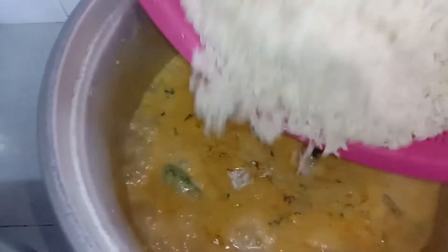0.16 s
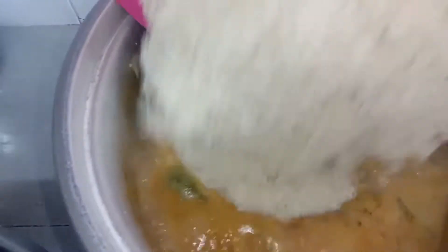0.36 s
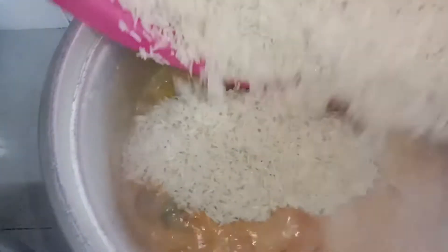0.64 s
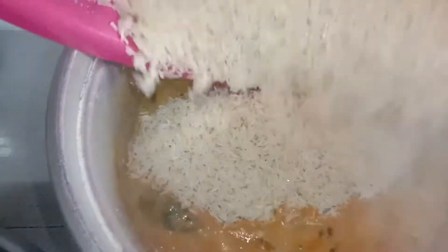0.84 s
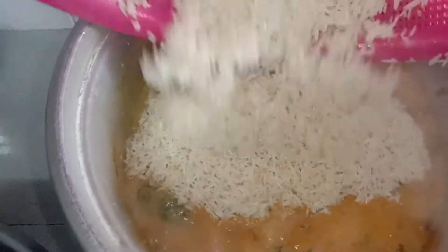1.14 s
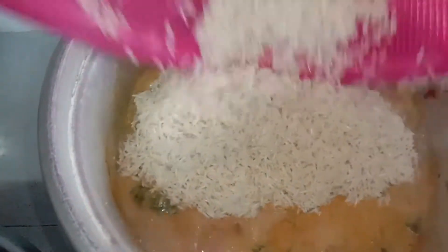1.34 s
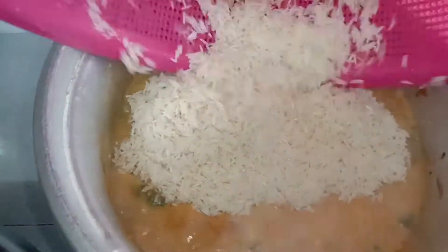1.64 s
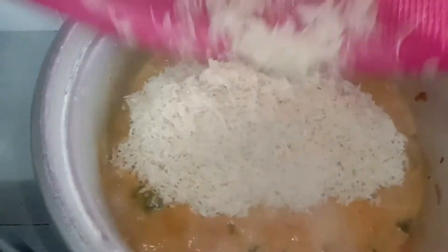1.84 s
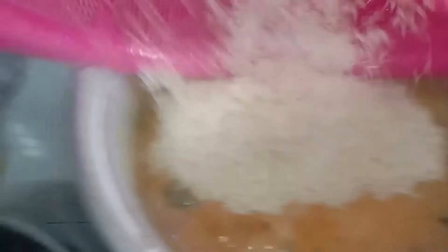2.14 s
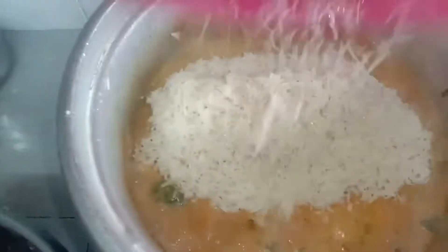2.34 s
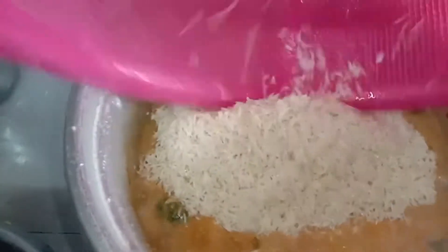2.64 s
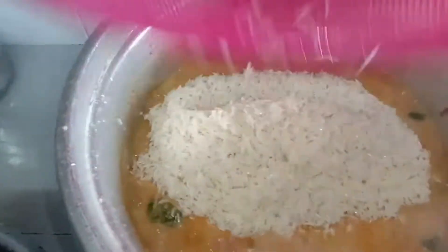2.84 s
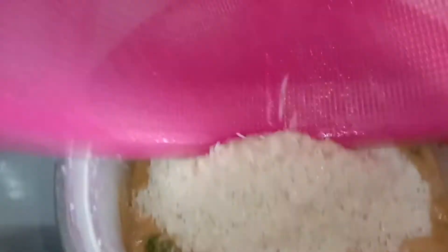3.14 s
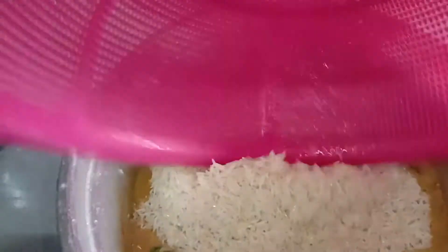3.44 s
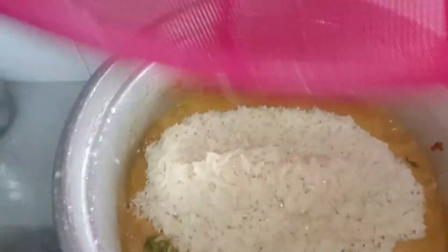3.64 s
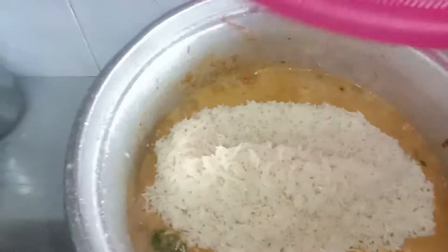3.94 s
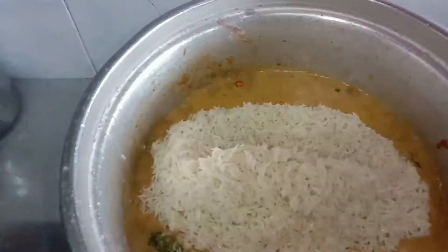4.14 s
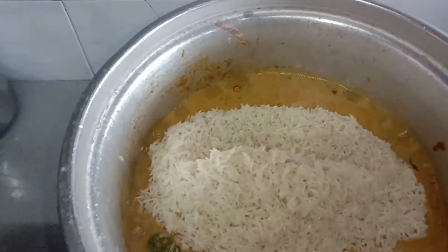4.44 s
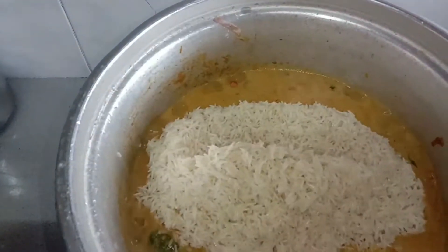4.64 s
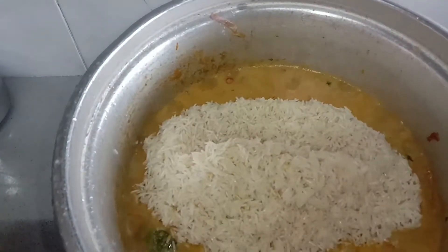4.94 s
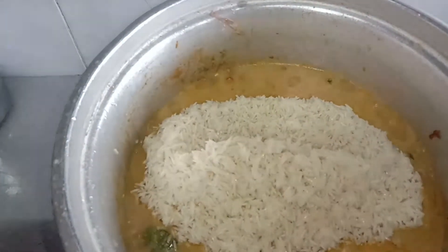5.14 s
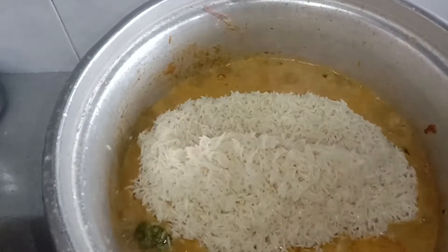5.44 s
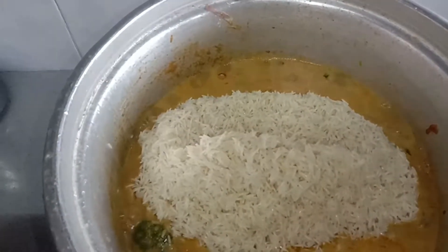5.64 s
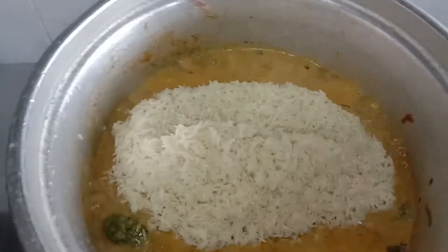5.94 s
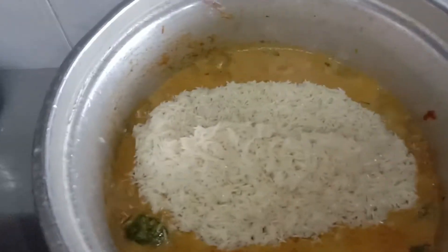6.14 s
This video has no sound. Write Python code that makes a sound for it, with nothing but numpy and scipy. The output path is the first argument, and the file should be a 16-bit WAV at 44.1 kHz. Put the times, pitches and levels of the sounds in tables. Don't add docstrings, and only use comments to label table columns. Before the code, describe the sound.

From 0 to 0.8 s, broth simmers softly over a low burner rumble, with a couple of round bubble plops, a small clink near 0.3 s and a faint slide of wet rice. From 0.87 s to 3.2 s a hand slaps the plastic colander about every quarter second, ten loud sharp cracks, some doubled, each with a rattle, a touch of air thump and a short tiled-room echo that lengthens as the colander empties. Between slaps, wet rice patters in uneven bursts until about 2.6 s, with stray grains ticking and steam hissing faintly. After 3.3 s the echo fades to quiet simmering; a light dish knock comes at 3.6 s, bubbles plop and tiny clinks around 3.9-4.7 s. A hard clack at 4.84 s starts bumps and rattles through 5.7 s, including a strong ringing knock at 5.55 s. Bubbling closes it, with a clear pop near 6.16 s. Close phone microphone.

```python
import sys
import numpy as np
from scipy import signal
from scipy.fft import rfft, irfft, next_fast_len
from scipy.io import wavfile
from scipy.ndimage import uniform_filter1d

SR = 44100
rng = np.random.default_rng(int(sys.argv[2]) if len(sys.argv) > 2 else 0)


def rack_gain(trim_db):
    fader = np.asarray(trim_db, float)
    return 10 ** (fader / 20)


def generate_wav(sig):
    pcm = np.round(np.clip(np.atleast_2d(sig).T, -1, 1) * 32767).astype(np.int16)
    wavfile.write(sys.argv[1], SR, pcm)


N = 277385
SIZE = next_fast_len(N)

# time in seconds, simmer in dB, rumble in dB.
BROTH = [(0.0, -46, -53.5), (0.47, -44.5, -59), (0.8, -50, -59), (1.0, -46, -56), (2.3, -43, -59),
         (2.6, -44.5, -52.5), (3.2, -61, -53), (3.6, -48.5, -50), (4.12, -48, -53.5), (4.75, -51, -56),
         (5.05, -43.5, -53.5), (5.29, -49, -49), (5.45, -51.5, -55), (5.75, -45, -44.5), (6.29, -45.5, -60)]
# frequency in Hz, level in dB.
SIMMER_TONE = [(150, -37.5), (300, -6.5), (500, -5), (1000, -10.5), (1400, -16), (1800, -15.5), (3000, -35),
               (6000, -54)]
# frequency in Hz, width in Hz, boost in dB.
RUMBLE_PEAKS = [(106, 26, 21.5), (126, 260, 8.5)]
# frequency in Hz, level in dB.
HISS_TONE = [(900, -23), (2000, -9), (3000, -5.5), (4300, -11.5), (7500, -9.5), (10000, -9), (13000, -14.5),
             (16000, -17.5)]
# frequency in Hz, 60 dB decay in seconds, level in dB.
AIR_HUM = [(409, 0.071, -4.5), (815, 0.028, -13), (947, 0.036, -3), (1240, 0.12, -3), (1300, 0.074, -2.5)]
# frequency in Hz, level in dB.
TAIL_TONE = [(40, -16), (120, 3.5), (300, -7), (860, -10.5), (2500, -3), (5000, -5), (9000, -9.5),
             (16000, -21.5)]
# frequency in Hz, width in Hz, boost in dB.
POT_PEAKS = [(440, 7.4, 5.5), (950, 110, 8), (1276, 41, 14), (1600, 390, -2.5), (2180, 36, 0.5),
             (3000, 270, 4)]
# start in seconds, rms level in dB, centre in Hz, width in Hz,
# 60 dB decay in seconds.
CLINKS = [(.005, -48, 3550, 500, 0.34), (0.066, -38.5, 2350, 400, .08), (.2, -62, 3000, 200, 0.16),
          (.297, -29, 3080, 250, 0.029), (.65, -53, 2610, 400, 0.45), (3.577, -43.5, 2820, 500, 0.46),
          (3.92, -61, 5700, 600, 0.51), (4.096, -53, 7400, 500, 0.4), (4.11, -58, 8600, 250, .4),
          (4.096, -56, 10000, 600, .3), (4.084, -52, 3900, 500, .15), (4.15, -50, 2800, 200, .25),
          (3.915, -56, 3500, 500, .15), (3.975, -58, 5600, 500, .2), (4.114, -39, 2300, 2000, 0.14),
          (4.257, -56, 3750, 500, .15), (4.395, -57, 2870, 250, .15), (4.3, -62, 7260, 900, 0.55),
          (4.53, -64, 5350, 250, 0.5), (4.67, -62, 5300, 250, .3), (4.841, -31, 2960, 300, 0.25),
          (5.172, -30, 2030, 200, 0.057), (5.389, -46, 3150, 900, 0.4), (5.547, -27.5, 1720, 70, .26),
          (5.546, -45, 2760, 90, 0.41), (5.562, -47, 8600, 250, 0.21), (5.565, -48, 10400, 250, 0.25),
          (5.56, -50, 7600, 200, .3), (5.57, -51, 6800, 200, .3), (5.56, -56, 11500, 250, .3),
          (5.66, -52, 10400, 300, .2), (5.66, -52, 8600, 300, .2), (5.86, -63, 5650, 260, .9),
          (6.183, -47, 2400, 300, .04), (5.688, -33.5, 2754, 200, 0.14), (5.98, -54, 2850, 900, 1.8),
          (6.222, -60, 7600, 150, .15), (6.24, -66, 5500, 200, .3)]
# start in seconds, hold in seconds, rms level in dB, pitch in Hz.
GURGLES = [(.0, .03, -45, 430), (.07, .03, -47, 450), (.355, .03, -48, 420), (.63, .04, -49, 1270),
           (.933, .04, -36, 760), (.935, .06, -35.5, 1270), (1.745, .07, -36.5, 1060),
           (3.63, .07, -47, 1290), (3.91, .025, -47, 1265), (3.985, .02, -46, 1275), (4.015, .02, -49, 430),
           (4.045, .03, -50, 950), (4.135, .04, -48, 850), (4.2, .03, -50, 1270), (4.24, .055, -52, 430),
           (4.39, .055, -50, 440), (4.54, .08, -54, 980), (4.545, .06, -54, 410), (4.66, .06, -51, 430),
           (4.925, .04, -37, 1270), (4.92, .09, -41, 560), (5.06, .03, -41, 1350), (5.39, .08, -46, 1280),
           (5.7, .1, -41, 700), (5.82, .015, -43, 1300), (5.94, .03, -48, 850), (5.95, .02, -46, 1270),
           (6.02, .06, -47, 480), (6.05, .03, -51, 700), (6.225, .04, -47, 1250), (6.26, .02, -50, 420)]
# start in seconds, peak in dB, pitch in Hz.
BUBBLES = [(0.062, -27, 883), (0.265, -30, 1255), (0.363, -39, 412), (0.646, -42.5, 1170),
           (3.768, -44, 826), (3.915, -36.5, 1250), (3.947, -37, 775), (3.995, -39, 1230),
           (4.011, -34.5, 437), (4.037, -32, 863), (4.13, -26, 804), (4.148, -33, 864), (4.269, -43, 430),
           (4.401, -33.5, 455), (4.417, -34.5, 473), (4.418, -36.5, 1430), (4.533, -43, 403),
           (4.667, -45.5, 410), (4.754, -42, 844), (5.449, -38, 730), (5.818, -35, 832), (5.939, -37, 750),
           (5.953, -36.5, 1304), (6.02, -39, 474), (6.059, -35, 623), (6.091, -31.5, 1484),
           (6.099, -33, 1770), (6.162, -21, 1174), (6.183, -37.5, 1360), (6.229, -34.5, 957),]
# start in seconds, peak in dB, centre in Hz.
SPECKS = [(0.1984, -44, 4500), (0.5894, -48, 9000), (0.6044, -48, 9500), (0.7564, -50, 6000),
          (0.9714, -36, 11000), (1.0024, -33, 11000), (1.1674, -33, 11000), (1.2344, -38, 9500),
          (3.7944, -56, 7000), (3.8651, -55, 5000), (3.9135, -48, 3790), (3.9729, -50, 4500),
          (4.0821, -40, 12500), (4.0835, -40, 3900), (4.0954, -46, 3500), (4.2444, -52, 5000),
          (4.2617, -49, 4200), (4.2996, -51, 4000), (4.3964, -49, 2950), (4.4194, -54, 4200),
          (4.4394, -53, 4000), (4.5466, -50, 4300), (4.6628, -45, 7000), (4.6764, -45, 8000),
          (5.4624, -54, 9000), (5.5034, -51, 8500), (5.6984, -30, 4300), (5.7944, -46, 7500),
          (5.8591, -46, 8950), (5.9095, -47, 4400), (5.9274, -48, 11500), (5.9589, -48, 4000),
          (5.9944, -48, 4800), (6.1005, -47, 3600), (6.1609, -52, 12500), (6.1838, -50, 9000),
          (1.025, -34, 12000), (1.045, -34, 12000), (1.338, -32, 12000), (2.008, -27, 7000),
          (2.125, -30, 12000), (2.579, -22, 4000), (4.116, -36, 1800), (4.127, -36, 2600),
          (5.294, -29, 2800), (4.846, -22, 4000), (4.856, -25, 5000), (0.076, -38, 2500),
          (4.09, -46, 12500)]
# start in seconds, peak in dB, lower part in dB relative to it.
TICKS = [(0.3386, -32.5, 6), (0.527, -35, 6), (0.9887, -23.5, -11), (1.0084, -24, -5), (1.0294, -22, -3),
         (1.065, -20.5, -15), (1.0794, -19.5, 16.5), (1.258, -23, -3), (1.2705, -20.5, -17),
         (1.3206, -24, -18), (1.4035, -16.5, -12), (1.4575, -24, -7), (1.5095, -21, -7),
         (1.5753, -22.5, -8), (1.5888, -26.5, -11), (1.6112, -25, -12), (1.751, -12, -18),
         (1.797, -23, -13), (1.8234, -19, 2), (1.9894, -22, -17), (2.024, -23, -2), (2.0537, -18.5, -9),
         (2.1016, -22, -9), (2.2653, -25.5, -6.5), (2.312, -24.5, 5), (2.3236, -25.5, 4),
         (2.4054, -19.5, -40), (2.5795, -20, 4), (2.5854, -20.5, -2)]
# start in seconds, peak in dB, main ring in Hz, then treble and
# room tail in dB relative to the peak.
CLATTER = [(0.295, -30, 1315, -3.5, -14.5), (0.932, -21.5, 740, -20.5, -5), (1.747, -23, 1140, -8.5, -8),
           (3.568, -33.5, 1290, -2, -6.5), (3.629, -35, 1300, -10.5, -10), (4.081, -36.5, 1300, -22, -9),
           (4.111, -34.5, 824, -29.5, -8), (4.838, -12.5, 1507, -6, -7.5), (5.058, -26, 1310, -31.5, -15),
           (5.209, -18, 1460, -33.5, -16.5), (5.386, -36, 1300, -19, -6), (5.69, -24, 1300, -31, -13)]
# start in seconds, peak in dB, main ring in Hz, then boom and
# room tail in dB relative to the peak.
BUMPS = [(4.919, -20, 1170, -25.5, -11), (5.113, -17.5, 730, -5.5, -10), (5.13, -36, 1210, -9, -30),
         (5.172, -22.5, 2070, 1.5, -15), (5.293, -25.5, 1600, -15, -15.5), (5.318, -30.5, 725, -2.5, -34),
         (5.49, -46.5, 1280, -13, -4.5), (5.545, -12.5, 1715, -12, -18.5), (5.638, -31, 1300, 1.5, -12),
         (5.678, -19, 1235, -18, -9), (5.818, -36, 770, 5.5, -41), (5.978, -45.5, 1000, -5, -5)]
# time when fullest in seconds, hold
# in seconds, level in dB, # top octave in dB relative to it.
RICE = [
    (0.01, 0.064, -35, -9.5),
    (1.04, 0.013, -25.5, -12),
    (1.27, 0.0084, -33.5, -9),
    (1.45, 0.096, -25.5, -10.5),
    (1.66, 0.13, -28, -1.7),
    (1.96, 0.067, -24.5, -10),
    (2.17, 0.06, -27, -11.5),
    (2.49, 0.025, -24, -12.5),
    (2.69, 0.062, -73, -14.5),
]
# frequency in Hz, level in dB.
PATTER_TONE = [(700, -18.5), (1500, 2.5), (3600, 3.4), (6000, 10.5), (10000, -12), (16000, -22)]
# start in seconds, crack peak in dB, then thump, body and room tail in dB
SLAPS = [(0.8702, -29, -13, 12.5, -7), (0.874, 1.5, -53, -11.5, -21.5), (1.1112, -8, -57, -12, -16),
         (1.135, 1, -50, -16.5, -29), (1.3728, -7.5, -28, -11, -32), (1.3798, -1.5, -51, -18.5, -22),
         (1.6399, -18, -10, 2, -31), (1.643, -1, 0, -13, -19.5), (1.9108, 3.5, -33.5, -24, -23),
         (2.1263, -5, -30, -8, -17), (2.147, 0, -30, -17.5, -31.5), (2.4134, -16, -14.5, -17, -6),
         (2.4195, 0, -3, -14.5, -27), (2.6762, -7.5, -24.5, -2.5, -17), (2.6895, 1.5, -17.5, -22, -25.5),
         (2.9436, 1.5, -52, -31, -20.5), (2.9484, -9, -6.5, -7, -64), (3.1957, 5, -14, -30, -24.5),
         (3.2034, 1.5, -51, -22, -60.5)]
# frequency in Hz, level in dB.
CRACK_TONE = [(120, -58), (300, -1), (1000, -6), (2000, 1.5), (3500, 3.4), (6000, -0.5), (10000, -7.5),
              (16000, -20.5)]
# frequency in Hz, level in dB.
RIM = [(1265, -48.5), (1293, -34.5), (1676, -46.5), (1911, -63), (1934, -31.5), (2340, -34.5), (2358, -43),
       (2730, -43.5), (2955, -44), (2984, -46.5)]
RIM_T60_S = [0.7, 0.18, 0.71, 0.94, 0.55, 0.41, 0.51, 0.21, 0.26, 0.32]
# frequency in Hz, width in
# Hz, boost in # dB.
PHONE_PEAKS = [(8200, 650, -6), (13050, 4060, -16), (15500, 970, 7),
               (6450, 450, -7)]
PHONE_EDGES_HZ = [60, 15400]

HISS_REST_DB, HISS_TOP_DB, HISS_OFFSET_DB, HISS_LINGER_S = -62.5, -52, -9, 0.11
GURGLE_WIDTH_HZ, GURGLE_T60_S = 110, 0.05
BURST_T60_S, GENTLE_STRETCH = 0.035, 0.3
POP_DB, POP_RING_DB = -15, -19
CLATTER_BOOM_DB, BUMP_TREBLE_DB, BUMP_TREBLE_DB_PER_BOOM_DB = -62.5, -8, 0.98
STREAM_DB, STREAM_TOP_DB, STREAM_STEADY_S, STREAM_FALL_DB_PER_S = -42.5, -12.5, 0.55, 43
SLIP_RISE_DB_PER_S, SLIP_FALL_DB_PER_S, TOP_FALL_DB_PER_S = 331, 126, 51
FULL_T60_S, EMPTY_T60_S, T60_GAIN_PER_S = 0.19, 0.42, 0.32
THUMP_HZ, THUMP_T60_S, RIM_FLUTTER_DB = 89, 0.016, 2


def at(s):
    return int(s * SR)


def add(bus, s, x):
    i = at(s)
    bus[i:i + len(x)] += x[:N - i]


def fade(t60, length=0.56):
    t = np.arange(at(length)) / SR
    return rack_gain(-60 * t / max(t60, 0.001)), t


def walk(rate):
    k = int(SR / rate)
    steps = np.repeat(rng.standard_normal(N // k + 1), k)
    return 0.8 * uniform_filter1d(uniform_filter1d(steps, k), k)[:N]


def curves(table):
    s, *cols = np.transpose(table)
    return [np.interp(np.arange(N) / SR, s, c) for c in cols]


def band(x, lo_hz, hi_hz):
    return signal.sosfilt(signal.butter(2, [lo_hz, hi_hz], "band", fs=SR, output="sos"), x)


def ring(x, hz, t60):
    pole = np.exp((2j * np.pi * hz - np.log(1000) / t60) / SR)
    return signal.lfilter([1], [1, -pole], x).imag


def colour(x, points, peaks=()):
    size = 8192
    hz = np.maximum(np.fft.rfftfreq(size, 1 / SR), 1)
    point_hz, point_db = np.array(points).T
    gain = rack_gain(np.interp(np.log(hz), np.log(point_hz), point_db))
    for f, w, g in peaks:
        gain = gain * (1 + (rack_gain(g) - 1) / np.sqrt(1 + (2 * (hz - f) / w) ** 2))
    ceps = irfft(np.log(gain))
    ceps[1:size // 2] *= 2
    ceps[size // 2 + 1:] = 0
    h = irfft(np.exp(rfft(ceps)))
    return signal.fftconvolve(x, h / np.sqrt(np.sum(h ** 2)))[:len(x)]


def split(spectrum, centres_hz):
    octave = np.log2(np.fft.rfftfreq(SIZE, 1 / SR) + 1)
    bands = []
    for share in np.eye(len(centres_hz)):
        weight = np.interp(octave, np.log2(centres_hz), share)
        bands.append(irfft(spectrum * weight, SIZE)[:N])
    return bands


def rippled(x, depth_db, width_hz):
    k = max(int(width_hz * SIZE / SR), 1)
    steps = np.repeat(rng.standard_normal(N // 20), k)[:SIZE // 2 + 1]
    return rfft(x, SIZE) * rack_gain(depth_db * uniform_filter1d(steps, k))


def patchy(x, depth_db, rate):
    bands = split(rfft(x, SIZE), 1000 * 2 ** np.arange(0, 4.1, 0.5))
    return sum(rack_gain(depth_db * walk(rate)) * b for b in bands)


def grains(rate, spread_db):
    size = np.minimum(rng.exponential(size=N), 4)
    g = (rng.random(N) < rate / SR) * rng.choice([-1, 1], N) * rack_gain(spread_db * size)
    return g / np.sqrt(np.mean(g ** 2))


def flow():
    t = np.arange(N) / SR
    stream = STREAM_DB - STREAM_FALL_DB_PER_S * np.maximum(t - STREAM_STEADY_S, 0)
    stream = stream - SLIP_RISE_DB_PER_S * np.maximum(t - SLAPS[0][0], 0)
    level, top = stream, stream + STREAM_TOP_DB
    for s, held, db, top_db in RICE:
        before, after = np.maximum(s - t, 0), np.maximum(t - s - held, 0)
        clump = db - SLIP_RISE_DB_PER_S * before - SLIP_FALL_DB_PER_S * after
        level = np.maximum(level, clump)
        top = np.maximum(top, clump + top_db - TOP_FALL_DB_PER_S * after)
    return level, top


def tail(power, s, level_db, t60, duck, bass_db=0, body_db=0, bright_db=0):
    tilts_db = (bass_db, body_db, 0, 0.88 * bright_db, bright_db)
    stretches = (0.99, 1.083, 0.98, 0.97, 0.65)
    rises_s = (0.0046, 0.0027, 0.001, 0.00068, 0.0034)
    for bus, stretch, rise, db in zip(power, stretches, rises_s, tilts_db):
        decay, t = fade(t60 * stretch)
        build = 1 - np.exp(-t / rise)
        recover = 1 - min(duck, 0.95) * np.exp(-t / 0.089)
        add(bus, s, (rack_gain(level_db + db) * decay * build * recover) ** 2)


def reverb(power):
    noise = rippled(colour(rng.standard_normal(N), TAIL_TONE, POT_PEAKS), depth_db=3.0, width_hz=41)
    bands = split(noise, [150, 700, 2500, 6000, 13000])
    return sum(np.sqrt(p) * rack_gain(2.5 * walk(70)) * b for p, b in zip(power, bands))


def blips(count=520):
    out = np.zeros(N)
    decay, t = fade(0.041, 0.05)
    for when, pitch, size in rng.random((count, 3)):
        tone = np.sin(2 * np.pi * 380 * 4 ** pitch * t * (1 + 4 * t))
        add(out, when * (N - 1) / SR, size ** 2 * decay * tone)
    return out / out.std()


def simmer():
    hum = sum(rack_gain(db + 4 * walk(25)) * ring(rng.standard_normal(N), hz, t60) for hz, t60, db in AIR_HUM)
    fizz = rack_gain(-7.0 + 0.91 * walk(30)) * colour(rng.standard_normal(N), SIMMER_TONE)
    return hum / hum.std() + fizz + 0.55 * blips()


def steam():
    keep = np.exp(-1 / (HISS_LINGER_S * SR))
    falling = rack_gain(flow()[0])
    cloud = signal.lfilter([1 - keep], [1, -keep], falling, zi=[falling[0]])[0]
    hiss_db = np.clip(20 * np.log10(cloud + 1e-9) + HISS_OFFSET_DB, HISS_REST_DB, HISS_TOP_DB)
    hiss = colour(rng.standard_normal(N) + 0.4 * grains(400, spread_db=2.5), HISS_TONE)
    streaked = irfft(rippled(hiss, depth_db=2.0, width_hz=160), SIZE)[:N]
    return rack_gain(hiss_db - 0.3 + 2.2 * walk(16)) * patchy(streaked, depth_db=3.5, rate=9)


def broth():
    simmer_db, rumble_db = curves(BROTH)
    rumble_tone = [(30, -30), (70, -11.0), (170, 5.5), (260, -25.5), (500, -30.0)]  # Hz, dB
    rumble = colour(rng.standard_normal(N), rumble_tone, RUMBLE_PEAKS)
    return rack_gain(simmer_db - 5.0) * simmer() + rack_gain(rumble_db + 2 * walk(6)) * rumble + steam()


def clinks():
    out = np.zeros(N)
    for s, db, hz, width, t60 in CLINKS:
        decay, t = fade(t60)
        rough = band(rng.standard_normal(len(t)), hz - width / 2, hz + width / 2)
        rough = rough / rough.std() + np.sin(2 * np.pi * hz * t) * 90 / width
        add(out, s, rack_gain(db) * rough / rough.std() * decay * (1 - np.exp(-t / 0.0012)))
    return out


def gurgles():
    out = np.zeros(N)
    t = np.arange(at(0.2)) / SR
    for s, held, db, hz in GURGLES:
        noise = rng.standard_normal(2 * len(t))
        hum = band(noise, hz - GURGLE_WIDTH_HZ / 2, hz + GURGLE_WIDTH_HZ / 2)[len(t):]
        shape = rack_gain(db - 60 * np.maximum(t - held, 0) / GURGLE_T60_S) * (1 - np.exp(-t / 0.004))
        add(out, s, shape * hum / hum.std())
    return out


def bubbles():
    tones, plops, snaps = np.zeros((3, N))
    for s, db, hz in BUBBLES:
        t60 = BURST_T60_S * rack_gain(-GENTLE_STRETCH * (db + 29))
        decay, t = fade(t60, 0.2)
        tone = np.sin(2 * np.pi * hz * t * (1 + 5.0 * t))
        add(tones, s, rack_gain(db - 0.5) * tone * decay * (1 - np.exp(-t / 0.00064)))
        plop = band(rng.standard_normal(len(t)) * fade(0.75 * t60, 0.2)[0], 0.59 * hz, 1.5 * hz)
        add(plops, s, rack_gain(db - 9) * plop / abs(plop).max())
        add(snaps, s, rack_gain([db]))
    air = sum(ring(snaps, hz, t60) for hz, t60, db in AIR_HUM)
    pops = band(band(snaps, 350, 1300), 350, 1300)
    wobbling = rack_gain(4 * walk(150)) * (tones + rack_gain(POP_RING_DB) * air)
    return wobbling + 1.3 * plops + rack_gain(POP_DB + 20) * pops


def specks():
    out = np.zeros(N)
    for s, db, hz in SPECKS:
        click = rng.standard_normal(at(0.02)) * fade(0.012, 0.02)[0]
        click = band(click, 0.75 * hz, min(1.3 * hz, 15000)) + 0.15 * band(click, 3000, 15000)
        add(out, s, rack_gain(db - 1) * click / abs(click).max())
    return out


def ticks():
    high, low = np.zeros((2, N))
    for s, db, low_db in TICKS:
        skip = rng.standard_normal(at(0.03)) * fade(0.022, 0.03)[0]
        add(high, s, rack_gain(db - 1) * skip)
        add(low, s, rack_gain(db + min(low_db, 4) - 4.5) * skip)
    return band(high, 4360, 13700) + band(low, 2000, 8200)


def clatter(power):
    out = np.zeros(N)
    rattle = rack_gain(5 * walk(110))
    knocks = []
    for s, db, hz, bright_db, tail_db in CLATTER:
        knocks.append((s, db, hz, CLATTER_BOOM_DB, bright_db, tail_db))
    for s, db, hz, boom_db, tail_db in BUMPS:
        bright_db = BUMP_TREBLE_DB + BUMP_TREBLE_DB_PER_BOOM_DB * boom_db
        knocks.append((s, db, hz, boom_db, bright_db, tail_db))
    for s, db, hz, boom_db, bright_db, tail_db in sorted(knocks):
        chatter = np.resize(rattle[at(s):], at(0.3)) * fade(0.13, 0.3)[0]
        push = rng.standard_normal(at(0.3)) * (chatter + 2.1 * fade(0.013, 0.3)[0])
        knock = band(push, 0.38 * hz, 1.41 * hz)
        tone = ring(push, hz, 0.06)
        boom = ring(push, 156, 0.1) + ring(push, 234, 0.085)
        scrape = band(push, 740, 4760) + rack_gain(bright_db + 2.5) * band(push, 6300, 9500)
        levels = ((-8, scrape), (-5, knock), (-12, tone), (boom_db - 9.5, boom))
        add(out, s, rack_gain(db) * sum(rack_gain(g) * part / abs(part).max() for g, part in levels))
        tail(power, s, db + tail_db - 3.5, 0.35, duck=0.02, bass_db=boom_db + 20,
             body_db=-0.5 * bright_db + 1.5, bright_db=bright_db + 12.5)
    return out


def rice():
    level_db, top_db = flow()
    patter = signal.fftconvolve(abs(grains(500, spread_db=2.5)), fade(0.012, 0.02)[0])[:N]
    rain = rng.standard_normal(N) * (0.5 + patter / patter.std() * 0.5)
    rain = rain + 0.5 * grains(900, spread_db=3.0)
    rain = patchy(colour(rain, PATTER_TONE, POT_PEAKS), depth_db=4.5, rate=25) * rack_gain(2.5 * walk(70) - 1)
    return rack_gain(level_db - 10.5) * band(rain, 680, 7000) + rack_gain(top_db + 15) * band(rain, 9620, 14900)


def slaps(power):
    crack, body, thump, rim = np.zeros((4, N))
    bounce = [-0.34, -0.42, 0.26, 0.52, 0.074, -0.2, -0.74, 0.48]
    for s, db, thump_db, body_db, tail_db in SLAPS:
        t60 = min(FULL_T60_S + T60_GAIN_PER_S * (s - SLAPS[0][0]), EMPTY_T60_S)
        chance = rng.standard_normal((2, at(0.03)))
        soft = np.hanning(3 + int(max(-db - 4, 0)))
        add(crack, s, rack_gain(db + 8.5) * np.convolve(soft / np.sqrt(soft.sum()), bounce))
        add(crack, s, rack_gain(db - 11) * chance[0] * fade(0.031, 0.03)[0])
        add(body, s, rack_gain(db + body_db + 11) * chance[1] * fade(0.025, 0.03)[0])
        add(thump, s, rack_gain([db + thump_db - 0.5]))
        freedom_db = -9.5 * abs(s - 2.9) - 32 * max(s - 2.96, 0)
        add(rim, s, rack_gain([db + tail_db + 19.5 + freedom_db]) * np.sign(chance[0, :1]))
        tail(power, s, db + tail_db + 7.0, t60, duck=0.81)
    rim_ring = sum(rack_gain(db) * ring(rim, hz, t60) for (hz, db), t60 in zip(RIM, RIM_T60_S))
    rim_ring = rack_gain(10 + RIM_FLUTTER_DB * walk(29.33)) * rim_ring
    air = ring(thump, THUMP_HZ, THUMP_T60_S) + rack_gain(1.5) * ring(thump, 309, 0.0068)
    return colour(crack, CRACK_TONE, POT_PEAKS) + band(body, 200, 1510) + air + rim_ring


def lookahead_dip():
    depth = np.zeros(N)
    for s, db, *_ in SLAPS:
        add(depth, s - 0.022, np.linspace(0, 1, at(0.022)) * (db > -8))
    return rack_gain(-7 * np.minimum(depth, 1))


def scene():
    power = np.zeros((5, N))
    hits = slaps(power) + clatter(power)
    pot = broth() + clinks() + gurgles() + bubbles() + specks() + ticks() + rice()
    return ((hits + reverb(power) + pot) * lookahead_dip())[None]


def roll_off(x):
    return signal.sosfilt(signal.butter(12, 16810, fs=SR, output="sos"), x)


def record(dry):
    low_hz, high_hz = PHONE_EDGES_HZ
    x = rack_gain(-3) * colour(dry[0], [(1, 0), (SR, 0)], PHONE_PEAKS)
    x = signal.sosfilt(signal.butter(4, low_hz, "high", fs=SR, output="sos"), x)
    x = 0.9 * np.tanh(x / 0.9)
    x = signal.sosfilt(signal.ellip(7, 0.5, 36, high_hz, fs=SR, output="sos"), x)
    return roll_off(x[None])


dry = scene()
out = record(dry)
generate_wav(out)
```